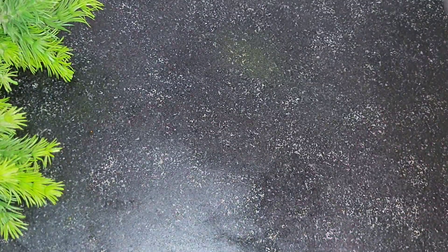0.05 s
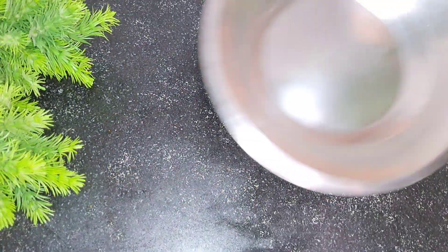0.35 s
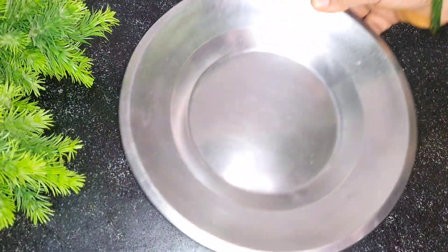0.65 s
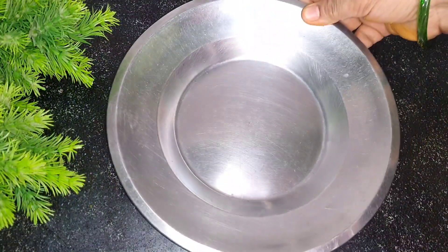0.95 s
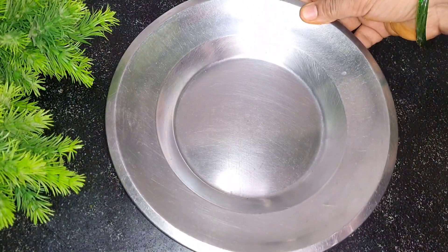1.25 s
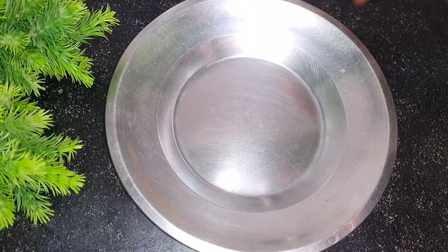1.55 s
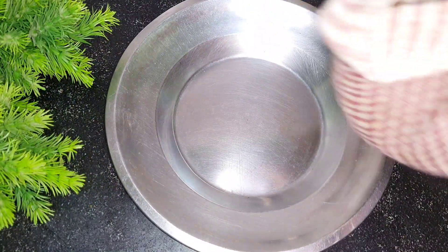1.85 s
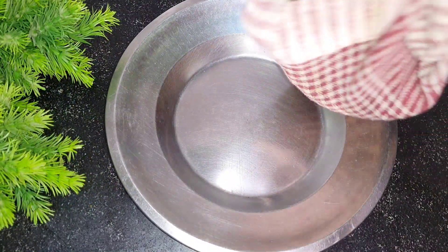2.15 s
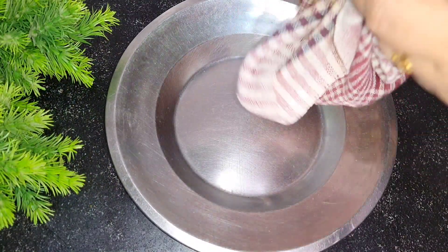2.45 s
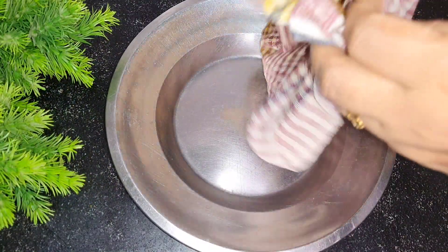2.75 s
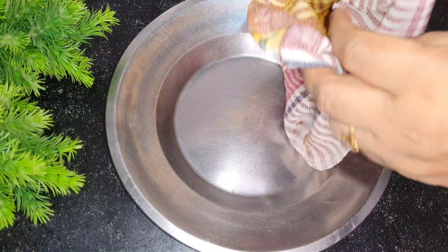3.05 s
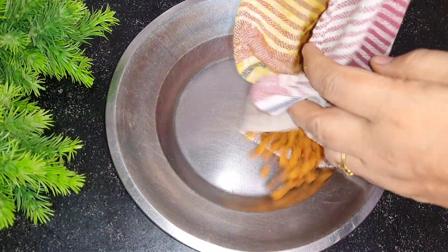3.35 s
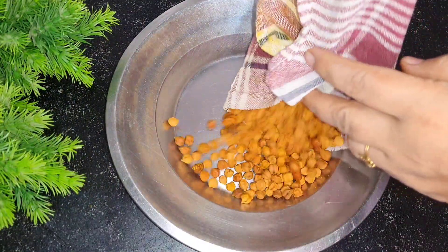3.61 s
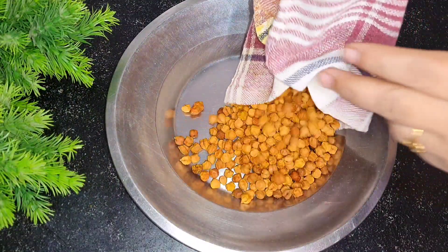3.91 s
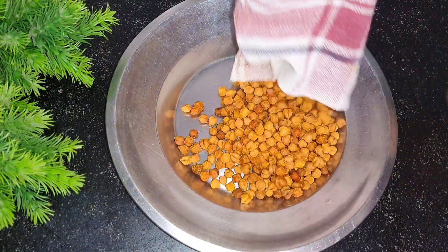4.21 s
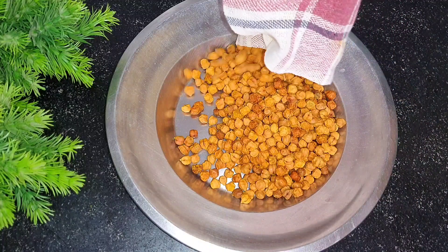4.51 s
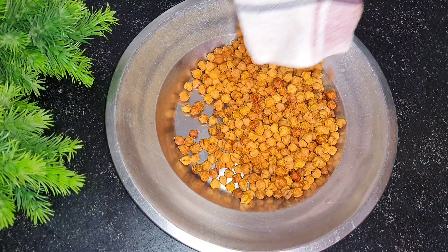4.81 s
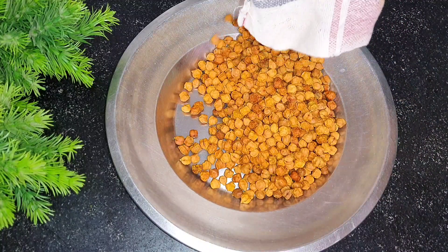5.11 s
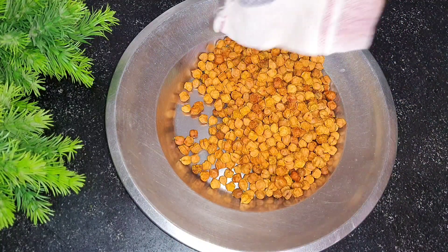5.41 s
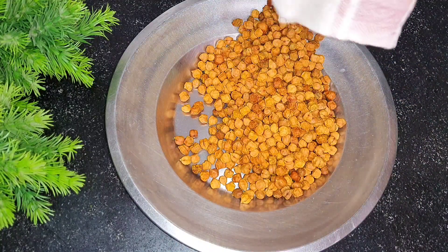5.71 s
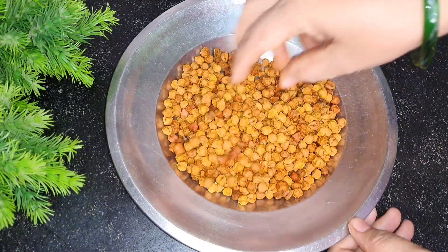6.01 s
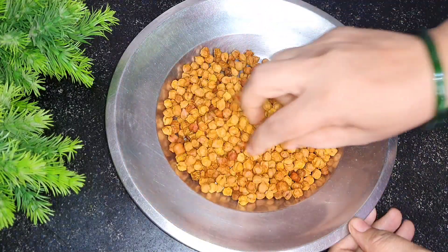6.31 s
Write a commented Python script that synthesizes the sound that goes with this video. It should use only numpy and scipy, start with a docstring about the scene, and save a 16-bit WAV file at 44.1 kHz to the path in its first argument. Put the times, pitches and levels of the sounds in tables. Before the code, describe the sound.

A steel plate rings faintly, then is set on a kitchen counter with a short, ringing clatter and a slight scrape. After a soft rustle of cloth, dried chickpeas pour onto it with a bright metallic rattle. Several more shakes follow, turning duller as the heap grows, and fingers briefly stir the peas. The sounds are close, in a small hard room with a low motor hum.

```python
"""A steel plate rings faintly, then clatters onto a kitchen counter and is nudged into place.
Dried chickpeas are shaken from a cloth in several surges. Each impact excites the modes of the
steel, less as the growing heap covers and damps it. Then fingers stir the heap.
A small hard room reverberates with the knocks, over the hum of a motor."""
import sys
import numpy as np
from scipy import signal
from scipy.fft import rfft, irfft, next_fast_len
from scipy.io import wavfile
from scipy.ndimage import uniform_filter1d

SR = 44100
rng = np.random.default_rng(int(sys.argv[2]) if len(sys.argv) > 2 else 0)


def generate_wav(signal):
    """Clip the signal to [-1, 1] and save it as 16-bit WAV at the path in sys.argv[1]."""
    frames = np.transpose(np.atleast_2d(signal))
    scaled = np.clip(frames, -1, 1) * 32767
    pcm = np.round(scaled).astype(np.int16)
    wavfile.write(sys.argv[1], SR, pcm)


N = 289296
TIME = np.arange(N) / SR
TAIL = TIME[:int(.8 * SR)]  # time axis of an impulse response

# Modes of the plate. Each row: frequency in Hz, relative dB struck at the base, the same struck inside.
PLATE_MODES = [(476, -10, -27), (915, -4, -15), (1044, -4, -10), (1176, 0, -11), (1337, -18, -3),
               (1483, -7, -7), (1623, -5, -1), (1658, -1, -4), (1687, -6, -5), (1792, -4, -9),
               (1959, -1, -10), (2295, -8, -19), (2484, -3, -11), (2527, -17, 0), (3090, -8, -11),
               (3200, -12, -11), (3238, -18, -5), (3289, -9, -11), (3784, -13, -15), (4196, -35, -11),
               (4554, -21, -19), (4920, -25, -9), (5340, -35, -10), (5415, -23, -11), (5622, -35, -4),
               (5714, -16, -13), (6742, -34, -11), (7859, -32, -25), (8416, -52, -14), (8901, -45, -15)]
# Share of peas that land on the heap instead of bare steel. Each row: time in seconds, share from 0 to 1.
HEAP_COVER = [(3.35, 0.01), (3.7, 0.49), (4.3, 0.29), (4.7, 1), (5.4, 1), (6.0, 1)]
# Spectra of a knock on the plate's body and of a small hard click. Each row: frequency in Hz, relative dB.
CLANG_SPECTRUM = [(40, -18), (100, -9), (250, -7.5), (500, -0.5), (800, -2.5), (1100, -5.5), (1700, 8.5),
                  (2200, -20), (3300, -6.5), (4300, -22.5), (7000, -35.5), (16000, -52.5)]
CLICK_SPECTRUM = [(500, -24), (2000, -11), (5000, -0.5), (7500, -11), (9500, -9.5), (13000, -8.5),
                  (16000, -17)]


def peas_on_steel(force, spots=4, bare_ring_db=-2.5, heap_ring_db=-10, plink_db=3):
    """Impacts excite modes: bare steel rings on, while steel damped by the heap gives a short plink."""
    # Modes of the loaded steel, then spectra of a knock on bare steel and on the heap.
    # Each row: frequency in Hz, relative level in dB.
    loaded_modes = [(1850, 0), (2550, -10), (3350, -16), (5300, -14)]
    bare_spectrum = [(200, -50), (550, -20.5), (850, -14.5), (1300, -3), (1700, -3), (2170, -17.5),
                     (2550, -9.5), (3300, -2.5), (4500, -22), (5400, -4), (6200, -14.5), (7400, -25.5),
                     (8800, -20.5), (16000, -32.5)]
    heap_spectrum = [(200, -43), (400, -25), (800, -11), (1250, -21.5), (1550, -3), (1850, -7),
                     (2200, -2.5), (2550, 3), (3300, -1.5), (4500, -13), (5300, -4), (6300, -25.5),
                     (7500, -20), (16000, -51)]
    hz, _, inside_db = np.transpose(PLATE_MODES)
    loaded_hz, loaded_db = np.transpose(loaded_modes)
    spot = rng.integers(0, spots, N)
    on_heap = rng.random(N) < curve(HEAP_COVER)
    out = 0
    for k in range(spots):
        steel = ring(hz, inside_db, t60=.24, scatter_db=1.5, spread=1.6)
        plink_hz = loaded_hz * (1 + 0.046 * rng.standard_normal(len(loaded_hz)))
        plink = ring(plink_hz, loaded_db, t60=0.047, scatter_db=8, spread=2.22)
        bare = knock(bare_spectrum, t60=.026, room_db=-3) + undb(bare_ring_db) * steel
        buried = knock(heap_spectrum, t60=.014, room_db=1)
        buried = buried + undb(plink_db) * plink + undb(heap_ring_db) * steel
        for response, lands in ((bare, ~on_heap), (buried, on_heap)):
            for index, push in enumerate(force * (lands & (spot == k))):
                out = out + convolve(push, unit(band(response, index)))
    return out


def pea_flow(sag_db_per_s=28):
    """Granular flow swells, thins and settles in surges. Returns its amplitude and its hardness in dB."""
    # A shift in the bundle, the main gush, three shakes, two trickles, two stirs. Each row: start in
    # seconds, level in dB, rise, length and settling time in seconds, hardness (treble gain) in dB.
    surges = [(2.998, -41, 0.39, 1, 0.16, -24.5), (3.308, -15.5, 0.087, 0.46, 0.35, -2.5),
              (3.997, -32, 0.034, 0.17, 0.87, -5), (4.277, -23, 0.071, 0.18, 1, -4.5),
              (4.673, -23, 0.065, 0.25, 0.27, -6), (5.01, -48.5, 0.13, 0.22, 0.36, -16),
              (5.306, -39.5, .04, 0.15, 0.17, -6), (5.982, -45, 0.0093, 0.028, 0.34, -3),
              (6.341, -36, 0.11, .23, 0.21, -10.5)]
    flow = treble = 1e-9
    for start, db, rise, length, settle, hard_db in surges:
        age = np.maximum(TIME - start, 0)
        surge = swell(start, rise, length, settle) * undb(db - sag_db_per_s * age)
        flow = flow + surge
        treble = treble + surge * undb(hard_db)
    return flow, 20 * np.log10(treble / flow)


def pea_forces(flow, hardness_db, peas_per_s=500, reference_db=-25.5, crowding=.4, stir_s=5.9):
    """Random impulses in four bands: a stronger flow brings more and heavier impacts."""
    # Single peas that stand out. Each row: time in seconds, level in dB, hardness in dB.
    loud_peas = [(3.244, -12, -49), (3.335, -1.5, 1.5), (3.351, 3, -1), (3.382, 8.5, -1), (3.535, 9, -25),
                 (3.883, -4, -42), (3.959, -2, -5), (4.034, -3, 1), (4.071, -5, -15), (4.112, 2, -6.5),
                 (4.124, -1, 3.5), (4.231, -1, -7), (4.3, 0, -8), (4.314, 6.5, -11), (4.364, -11, 12),
                 (4.535, -12, 16), (4.578, -2.5, -11), (4.695, -9.5, 10.5), (4.746, -8, 20.5),
                 (4.773, 5.5, -11), (4.785, 2, -1.5), (4.809, 1, 8.5), (4.907, 3, -2), (5.052, -7, -3),
                 (5.128, -22, 8), (5.204, -17, 2), (5.332, -11, -2.5), (5.354, -11, -6.5),
                 (5.378, -3.5, -14), (5.432, -30.5, 30), (5.996, -9, -2), (6.026, -6, -7.5),
                 (6.056, -4.5, -12.5), (6.135, -6.5, -8.5), (6.192, -14.5, -18), (6.224, -22.5, -17),
                 (6.462, -8.5, -5), (6.532, -3.5, -11)]
    hits = shower(peas_per_s * (flow / undb(reference_db)) ** crowding, scatter_db=7.5)
    # A full heap damps the bass; pressing fingers add to it.
    bass_db = -3.5 - 10.5 * curve(HEAP_COVER) ** 2 + 9.5 * (TIME > stir_s)
    force = hits * flow * contact(hardness_db, bass_db)
    for start, db, hard_db in loud_peas:
        i = int(start * SR)
        force[:, i] = undb(db) * contact(hard_db, bass_db[i] - 4)
    return force


def contact(hard_db, bass_db):
    """Stiffness sets the four band gains: hard contact is bright and thin, soft contact dull and full."""
    presence_db = 0.5 + 0.44 * hard_db
    return undb([bass_db - 0.18 * hard_db, np.zeros_like(hard_db), presence_db, hard_db])


def peas_on_peas(treble, count=3, shell_db=-23):
    """Brief collisions of hard, dry shells radiate clicks, now and then a bright clash."""
    # Each row: time in seconds, level in dB.
    clashes = [(3.3814, 10), (3.48, 7.5), (3.5277, 7.5), (4.04, -4), (4.094, -7), (4.4267, 5),
               (4.7473, 5.5), (4.8252, 8), (4.835, 7), (5.4336, -9), (6.5326, -8.5)]
    showers = [shower(500, scatter_db=5) * treble * undb(shell_db) for _ in range(count)]
    out = sum(convolve(hits, knock(CLICK_SPECTRUM, t60=0.019, room_db=-12.5)) for hits in showers)
    for start, db in clashes:
        add(out, start, undb(db) * knock(CLICK_SPECTRUM, t60=0.1, room_db=-2.5))
    return out


def plate_set_down(ring_db=11, clang_db=6, upper_db=-13, chatter_db=-31, chatter_s=0.19):
    """Rocking impacts excite the hand-damped plate, which chatters on the counter between them."""
    # Each row: time in seconds, level in dB, tilt above 800 Hz in dB per octave.
    blows = [(.8175, 0.5, 1.5), (.834, -1.5, 0), (.878, -1.5, 0.5), (.917, -4.5, 1), (1.014, -17.5, -5.5),
             (1.06, -14.5, 6.5)]
    hz, base_db, _ = np.transpose(PLATE_MODES)
    upper_hz = rng.uniform(4600, 14220, 30)  # many faint high modes
    upper_fall_db = -10 * np.log2(upper_hz / upper_hz.min())
    out = np.zeros((2, N))
    for start, db, tilt_db in blows:
        steel = undb(ring_db) * ring(hz, base_db, t60=0.21, scatter_db=1.5, spread=1)
        steel += undb(upper_db) * ring(upper_hz, upper_fall_db, t60=.28, scatter_db=7, spread=3)
        blow = steel + undb(clang_db) * knock(CLANG_SPECTRUM, t60=0.12, room_db=-3.5)
        tilt = [(200, -tilt_db), (800, -tilt_db), (12800, 3 * tilt_db)]
        add(out, start, undb(db) * colour(blow, tilt))
    age = np.maximum(TIME - blows[0][0], 0)
    chatter = shower(700, scatter_db=4) * (age > 0) * undb(chatter_db) * np.exp(-(age / chatter_s) ** 2)
    tap = knock(CLANG_SPECTRUM, t60=0.0394, room_db=-3.5)
    tap += ring(hz, base_db, t60=0.091, scatter_db=4, spread=.9)
    return out + convolve(chatter, tap)


def plate_slides(ring_db=-9.5):
    """Sliding friction: grit under the base gives tiny impacts that favour the high modes."""
    # Each row: start in seconds, level in dB, length in seconds.
    slides = [(0.95, -44, 0.17), (1.42, -53.5, 0.069)]
    hz, base_db, _ = np.transpose(PLATE_MODES)
    bright_db = base_db + 6 * np.log2(hz / hz.min())
    grit = knock(CLICK_SPECTRUM, t60=0.031, room_db=-9)
    grit += undb(ring_db) * ring(hz, bright_db, t60=.09, scatter_db=15, spread=0.95)
    sliding = gestures(slides, rise=0.01, stop=0.089)
    return convolve(shower(4400, scatter_db=6) * sliding, grit)


def carried_plate(level_db=-55, twin_db=-7, beat_hz=3.37, grip_s=0.59):
    """Close pairs of modes beat slowly in free decay until the tightening grip damps them."""
    # Each row: frequency in Hz, relative level in dB, time to fall 60 dB in seconds.
    lingering_modes = [(684, -8.5, 5.2), (1183, -12, 1.4), (1330, -2.5, 0.9), (1802, -9, 5.7),
                       (2298, 0, 3.2), (2840, -18, 2.8), (3530, -9.5, 0.86), (3870, -7.5, 1)]
    tone = 0
    for hz, db, t60 in lingering_modes:
        beating = 1 + undb(twin_db) * np.exp(2j * np.pi * beat_hz * rng.uniform(0.74, 1.19) * TAIL)
        phase = 2 * np.pi * hz * TAIL + rng.normal(0, 1, (2, 1))
        tone = tone + undb(level_db + db) * fade(t60) * np.imag(beating * np.exp(1j * phase))
    held = np.minimum(TAIL / 0.00045, 1) / (1 + (TAIL / grip_s) ** 8)
    return np.pad(tone * held, ((0, 0), (0, N - len(TAIL))))


def rim_brushes(centre_hz=1660, fall_db_per_octave=22, rub_db=-8):
    """Light friction of fingers and cloth on the rim excites mainly the plate's middle modes."""
    # Each row: start in seconds, level in dB, length in seconds.
    touches = [(1.429, -49.5, .035), (2.572, -58, .02), (2.734, -58.5, .05)]
    hz, base_db, _ = np.transpose(PLATE_MODES)
    mode_db = base_db - fall_db_per_octave * np.abs(np.log2(hz / centre_hz))
    steel = ring(hz, mode_db, t60=0.21, scatter_db=5.5, spread=1)
    friction = shower(2000, scatter_db=5) * gestures(touches, rise=0.014, stop=0.089)
    return convolve(friction, steel + undb(rub_db) * knock(CLANG_SPECTRUM, t60=0.037, room_db=-6))


def cloth():
    """Stick-slip friction: fibres give way in fine crackles at each tug on the bundle."""
    # Each row: start in seconds, level in dB, length in seconds.
    tugs = [(1.576, -66, 0.19), (1.85, -74.5, .7), (2.72, -51, .06), (2.904, -63, 0.54)]
    # Each row: frequency in Hz, relative level in dB.
    rustle_spectrum = [(300, -6), (1500, -7), (2600, -8.5), (4500, 2.5), (7000, -7), (10000, -9),
                       (16000, -11.5)]
    slips = shower(530, scatter_db=8) * gestures(tugs, rise=0.041, stop=0.63)
    return convolve(slips, knock(rustle_spectrum, t60=0.012, room_db=0))


def bumps():
    """Low-frequency vibration: the counter thuds softly as the plate is set down and the bundle handled."""
    # Each row: time of the peak in seconds, level in dB, Gaussian width in seconds.
    pushes = [(0.594, -73, 0.019), (.87, -62, 0.022), (1.048, -44, 0.051), (2.555, -59, 0.011),
              (4.994, -47.5, 0.071), (5.09, -51, 0.069), (5.49, -54.5, 0.05)]
    # Each row: frequency in Hz, relative level in dB.
    thud_spectrum = [(33, -47), (55, -10.5), (80, 1.5), (140, -9), (220, -14.5), (340, -0.5), (600, -21.5),
                     (2000, -65.5)]
    envelope = sum(undb(db) * np.exp(-.5 * ((TIME - peak) / width) ** 2) for peak, db, width in pushes)
    return envelope * steady_noise(thud_spectrum)


def kitchen(air_db=-60, waver_db=2.5, drift_rad=.7):
    """Broadband room noise lies under a motor's tones, which waver in amplitude and phase."""
    # Spectrum of the room noise. Each row: frequency in Hz, relative level in dB.
    air_spectrum = [(15, -46), (28, -23.5), (50, -7), (87, -1), (175, -6), (223, -16.5), (285, -2.5),
                    (344, -12), (405, -10.5), (451, -13), (818, -29), (3620, -36), (6560, -30),
                    (7710, -33.5), (14800, -34.5), (16000, -38)]
    # Each row: frequency in Hz, RMS level in dB.
    motor_tones = [(102.3, -63.5), (150.7, -80), (177.6, -79), (285.3, -67), (393.0, -73), (570.6, -79.5)]
    out = steady_noise(air_spectrum) * undb(air_db)
    knots = np.arange(0, 7, .08)
    for hz, db in motor_tones:
        drift, waver = (np.interp(TIME, knots, rng.standard_normal(len(knots))) for _ in range(2))
        wave = np.sin(2 * np.pi * hz * TIME + drift_rad * drift)
        out = out + np.sqrt(2) * undb(db + waver_db * waver) * wave
    return out


def ring(hz, mode_db, t60, scatter_db, spread):
    """A sum of randomly weighted damped modes; high ones die sooner and differ more between the sides."""
    hz = hz[:, None]
    size, detune, left, right = rng.standard_normal((len(hz), 4)).T[:, :, None]
    amplitude = undb(mode_db[:, None] + scatter_db * size) * rng.choice([-1, 1], hz.shape)
    decay_rate = np.log(1000) / t60 * (hz / 2000) ** 0.037
    modes = amplitude * np.exp(TAIL * (2j * np.pi * hz * (1 + 0.0017 * detune) - decay_rate))
    side_phase = np.array([left, right]) * spread * hz / (hz + 2000)
    return unit(np.imag(modes * np.exp(1j * side_phase)).sum(axis=1))


def knock(spectrum, t60, room_db, room_t60=.52):
    """Dense, quickly dying modes merge into a noise burst, followed by the room's reverberation."""
    echo = noise(len(TAIL)) * fade(room_t60) * (1 - np.exp(-TAIL / 0.0013))
    direct = noise(len(TAIL)) * fade(t60)
    return unit(colour(unit(direct) + undb(room_db) * unit(echo), spectrum))


def shower(per_s, scatter_db):
    """A Poisson train of impacts of random size, its running power levelled to roughly one."""
    lands = rng.random(N) < per_s / SR
    hits = lands * undb(scatter_db * rng.standard_normal(N)) * rng.choice([-1, 1], N)
    power = uniform_filter1d(hits ** 2, size=1600)
    return hits / np.sqrt(np.abs(power) + 0.17 * np.mean(power))


def swell(start, rise, length, stop):
    """An envelope that rises, holds until `length` seconds old, then falls 60 dB in `stop` seconds."""
    age = np.maximum(TIME - start, 0)
    return np.minimum(age / rise, 1) ** 2 * np.exp(-np.log(1000) * np.maximum(age - length, 0) / stop)


def gestures(rows, rise, stop):
    """The summed envelopes of several movements."""
    return sum(undb(db) * swell(start, rise, length, stop) for start, db, length in rows)


def noise(n):
    """White stereo noise whose coherence between the sides falls toward the treble."""
    # Each row: frequency in Hz, coherence from 0 to 1.
    coherence = [(60, .72), (300, .75), (700, .65), (1400, .55), (3000, .1), (7000, .02)]
    alike = at_hz(coherence, np.fft.rfftfreq(n, 1 / SR))
    mid, side = rfft(rng.standard_normal((2, n))) * np.sqrt([(1 + alike) / 2, (1 - alike) / 2])
    return irfft([mid + side, mid - side], n)


def steady_noise(spectrum):
    """Stationary coloured noise with a mean power of one."""
    return unit(colour(noise(N), spectrum)) * np.sqrt(N)


def colour(x, spectrum):
    """Minimum-phase filtering, by folding the cepstrum of the given spectrum."""
    n = 2 * next_fast_len(x.shape[-1] // 2 + 2048)
    cepstrum = irfft(np.log(undb(at_hz(spectrum, np.fft.rfftfreq(n, 1 / SR)))))
    cepstrum[1:n // 2] *= 2
    cepstrum[n // 2 + 1:] = 0
    return irfft(rfft(x, n) * np.exp(rfft(cepstrum)))[..., :x.shape[-1]]


def band(x, index):
    """Band-pass filtering to the bass (0), middle (1), presence (2) or treble (3)."""
    edges_hz = [(420, 1400), (1450, 2200), (2250, 4450), (4450, 17000)][index]
    return signal.sosfilt(signal.butter(4, edges_hz, "band", fs=SR, output="sos"), x)


def convolve(x, response):
    """Drive a stereo impulse response with a mono excitation."""
    return signal.oaconvolve(x[None], response, axes=1)[:, :N]


def add(out, start, sound):
    """Superpose a sound from `start` seconds on."""
    i = int(start * SR)
    out[:, i:i + sound.shape[1]] += sound[:, :N - i]


def fade(t60):
    """Exponential decay by 60 dB in t60 seconds."""
    return np.exp(-np.log(1000) * TAIL / t60)


def curve(rows):
    """Linear interpolation in time."""
    return np.interp(TIME, *np.transpose(rows))


def at_hz(points, hz):
    """Interpolation on a log-frequency axis."""
    f, value = np.transpose(points)
    return np.interp(np.log(hz + 1), np.log(f), value)


def unit(x):
    """Scale to a mean energy of one per channel."""
    return x / np.sqrt(np.sum(x ** 2) / len(x))


def undb(db):
    """Decibels to amplitude gain."""
    return 10 ** (np.asarray(db) / 20)


def scene():
    """The sounds of peas, plate, cloth and kitchen add by superposition."""
    flow, hardness_db = pea_flow()
    peas = peas_on_steel(pea_forces(flow, hardness_db)) + peas_on_peas(flow * undb(hardness_db))
    plate = carried_plate() + plate_set_down() + plate_slides() + rim_brushes()
    return peas + plate + cloth() + bumps() + kitchen()


def record(dry):
    """Two microphone ports differ in frequency response; peaks clip and the top is cut at 16 kHz."""
    # Each row: frequency in Hz, left minus right in dB.
    balance = [(100, -7), (380, -8), (700, 3), (1600, 0.5), (2500, 2), (4000, -3), (5500, -2.5),
               (6700, -13), (8500, 5.5), (15000, 1.5)]
    left = colour(dry[0], [(hz, db / 2) for hz, db in balance])
    right = colour(dry[1], [(hz, -db / 2) for hz, db in balance])
    low_pass = signal.ellip(10, .2, 80, 16000, fs=SR, output="sos")
    return signal.sosfilt(low_pass, np.clip([left, right], -1, 1))


dry = scene()
out = record(dry)
generate_wav(out)
```